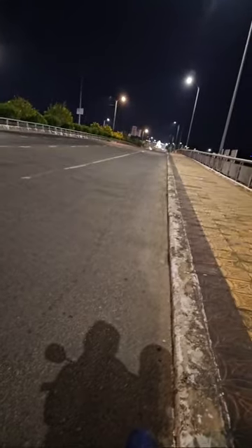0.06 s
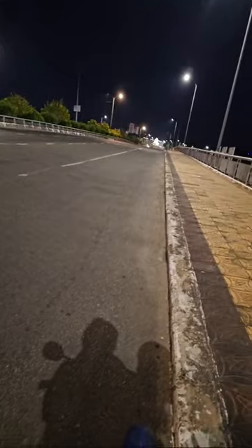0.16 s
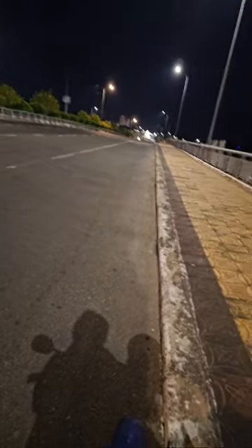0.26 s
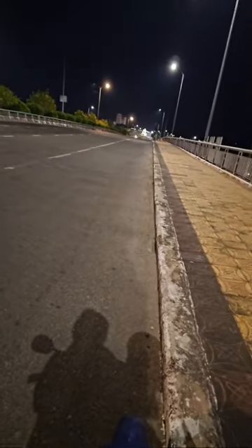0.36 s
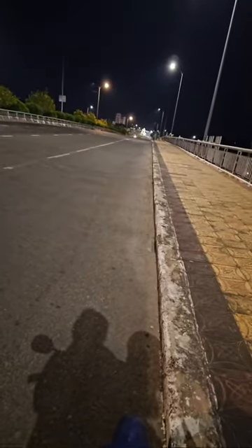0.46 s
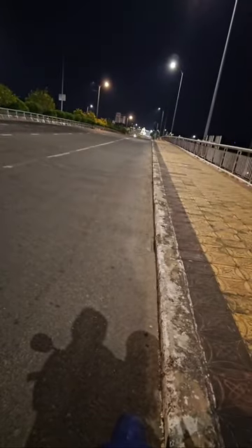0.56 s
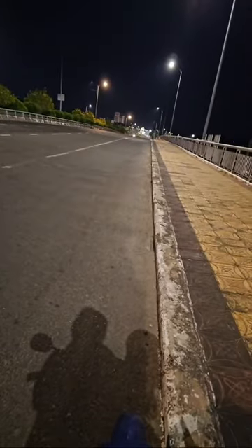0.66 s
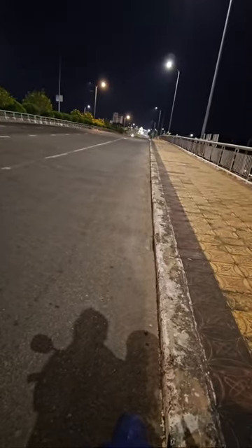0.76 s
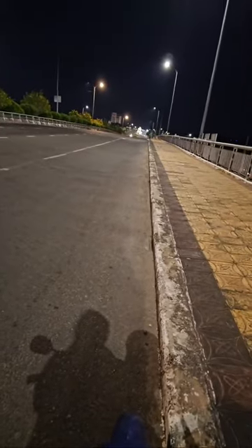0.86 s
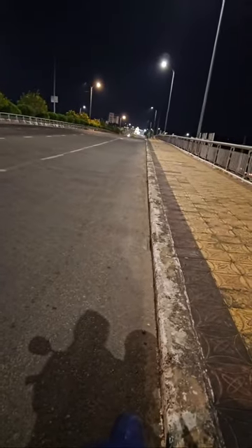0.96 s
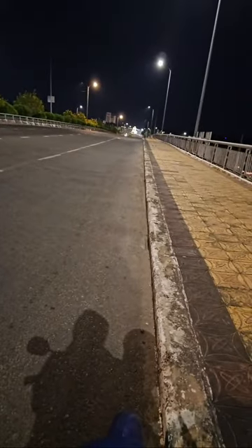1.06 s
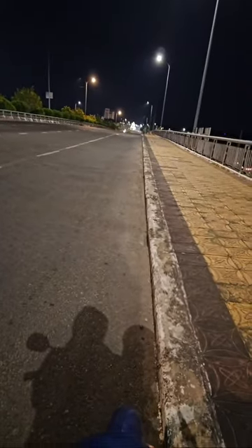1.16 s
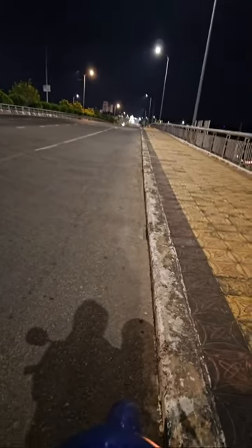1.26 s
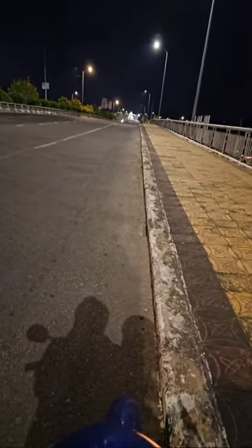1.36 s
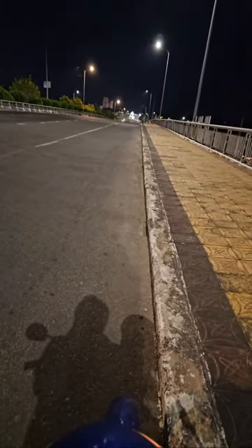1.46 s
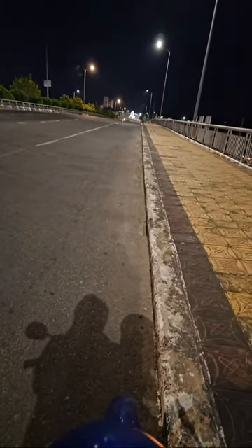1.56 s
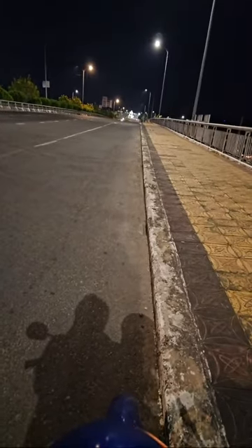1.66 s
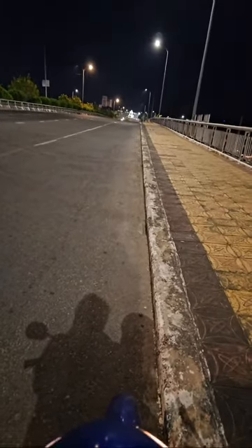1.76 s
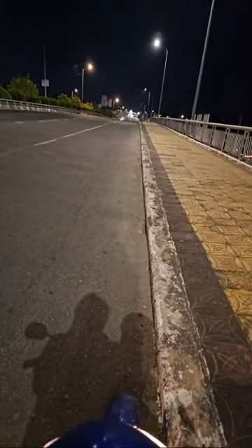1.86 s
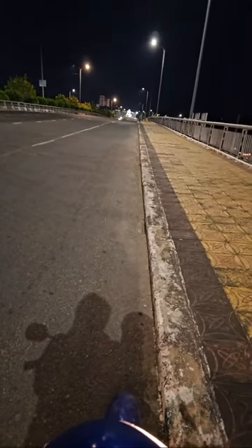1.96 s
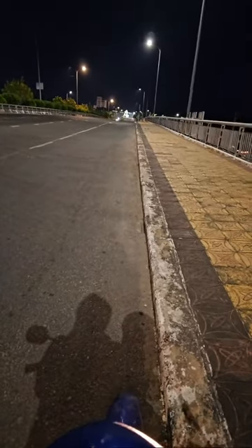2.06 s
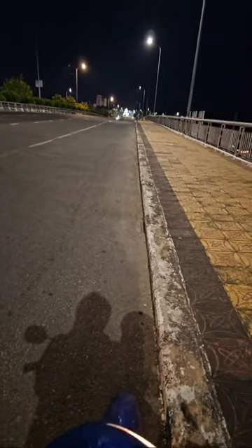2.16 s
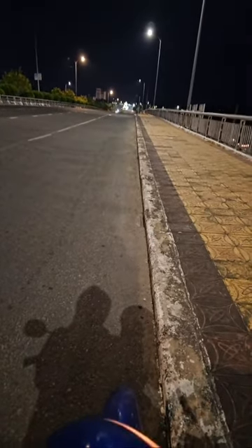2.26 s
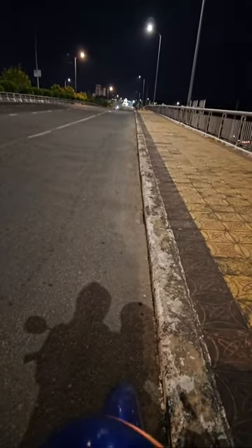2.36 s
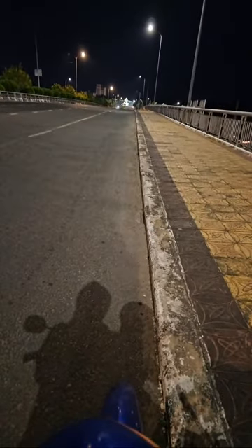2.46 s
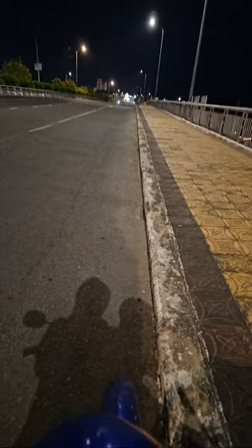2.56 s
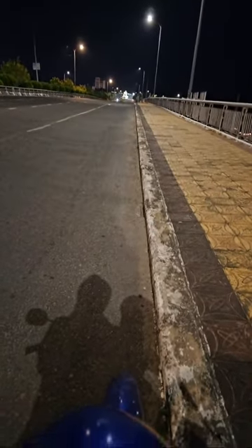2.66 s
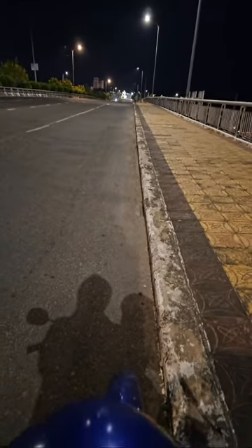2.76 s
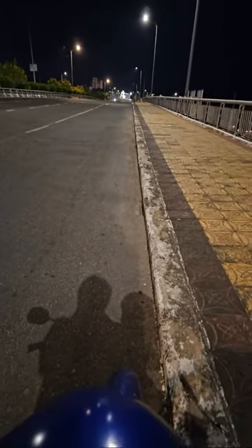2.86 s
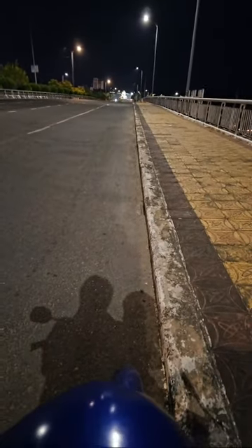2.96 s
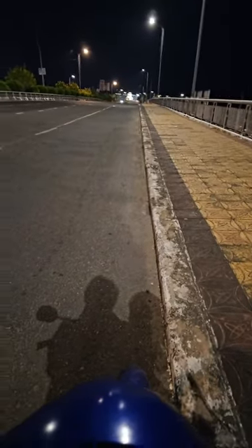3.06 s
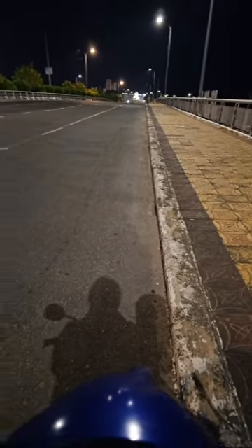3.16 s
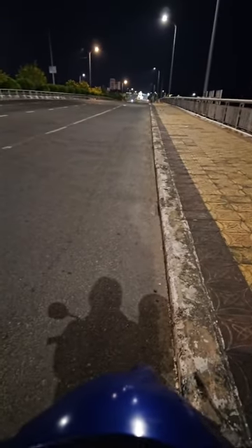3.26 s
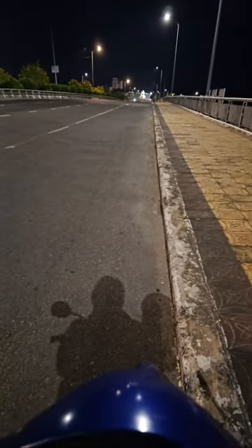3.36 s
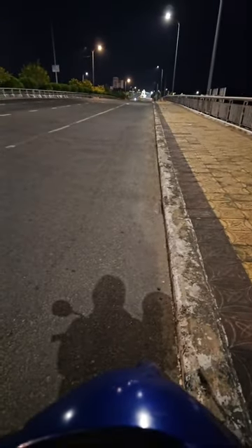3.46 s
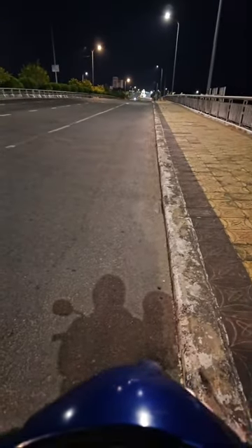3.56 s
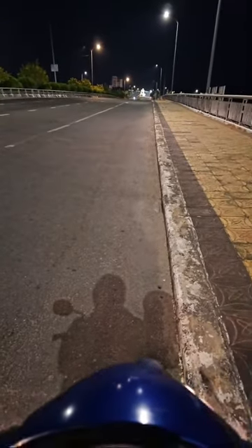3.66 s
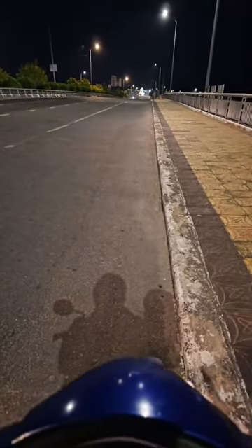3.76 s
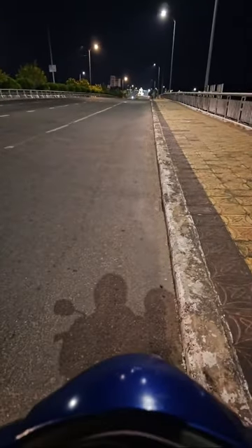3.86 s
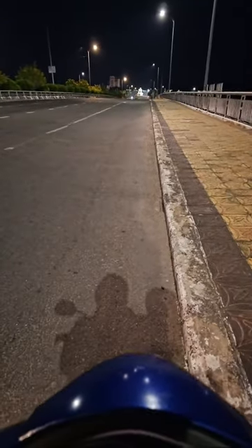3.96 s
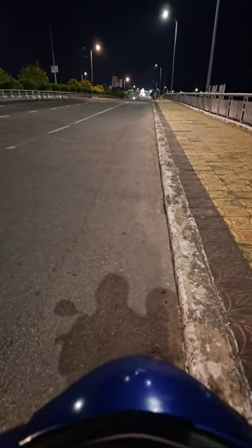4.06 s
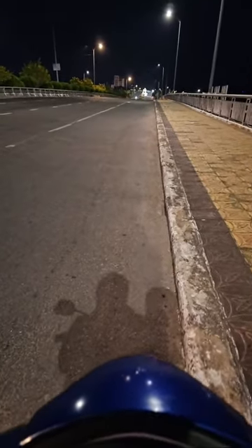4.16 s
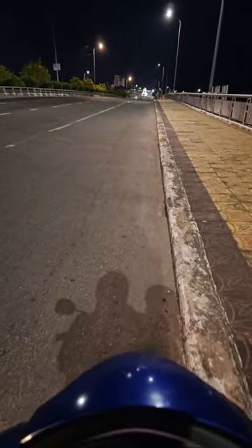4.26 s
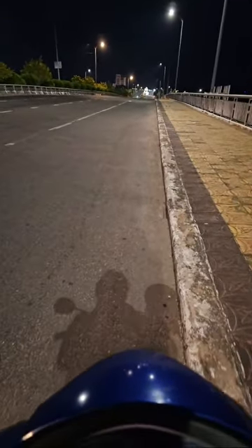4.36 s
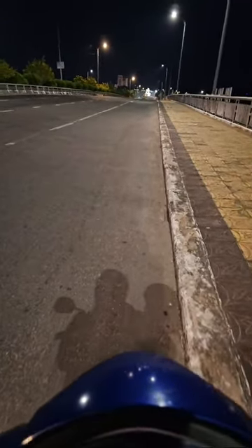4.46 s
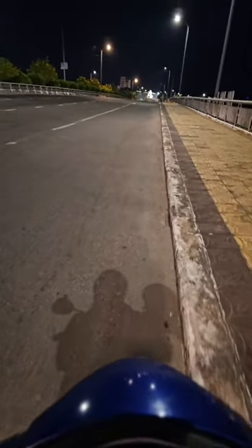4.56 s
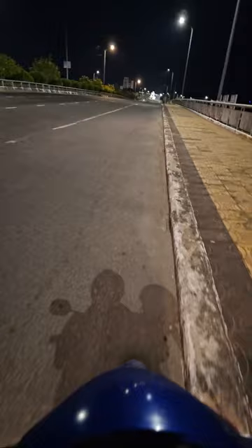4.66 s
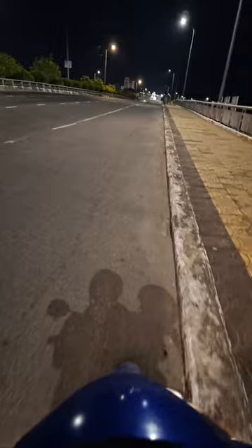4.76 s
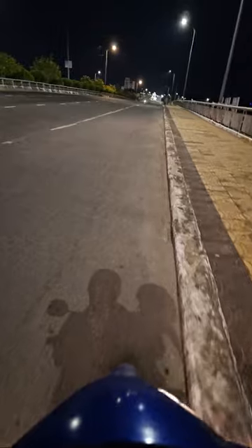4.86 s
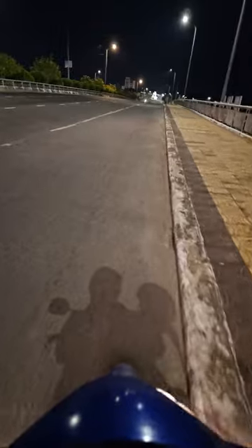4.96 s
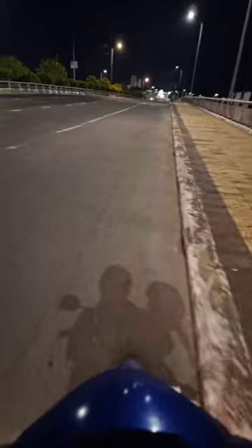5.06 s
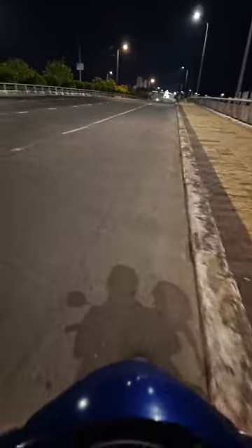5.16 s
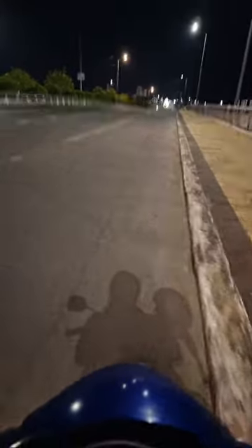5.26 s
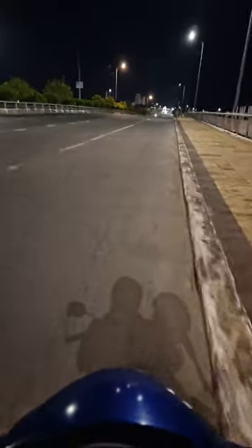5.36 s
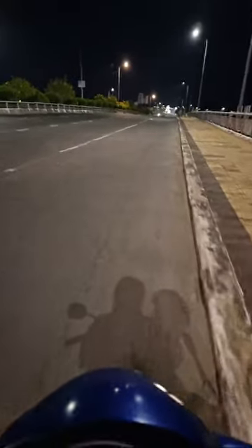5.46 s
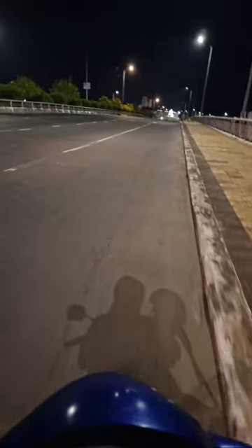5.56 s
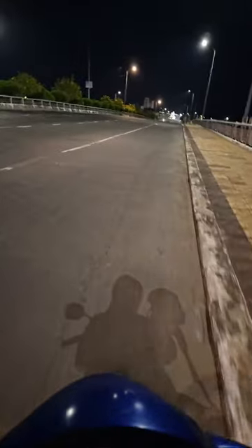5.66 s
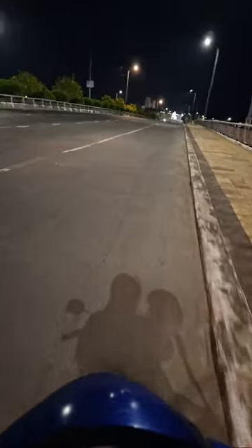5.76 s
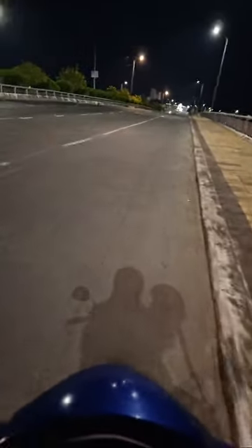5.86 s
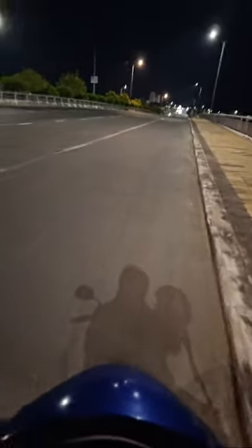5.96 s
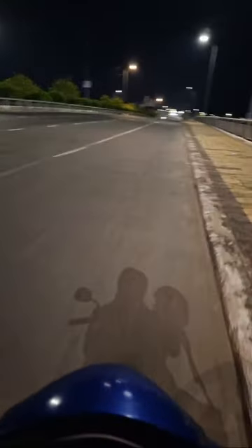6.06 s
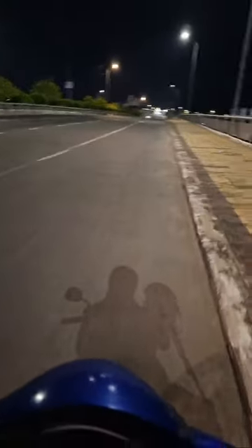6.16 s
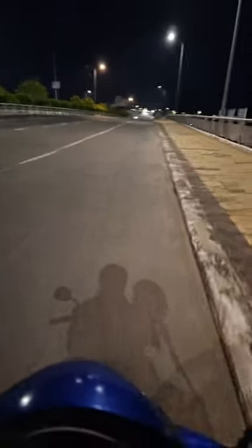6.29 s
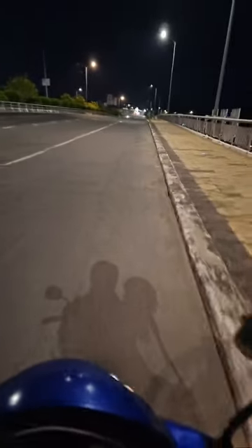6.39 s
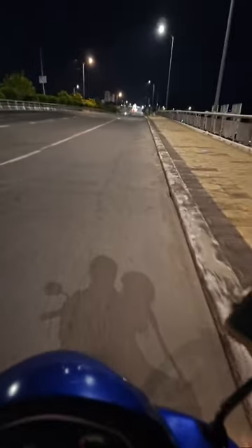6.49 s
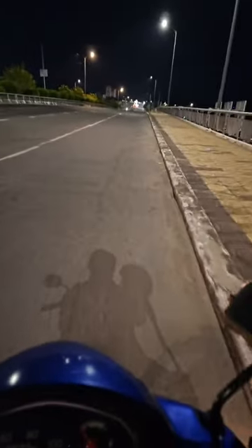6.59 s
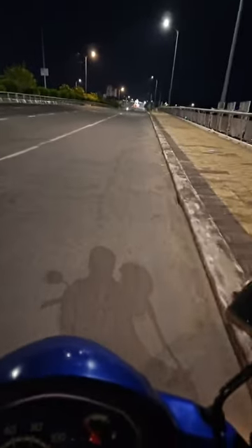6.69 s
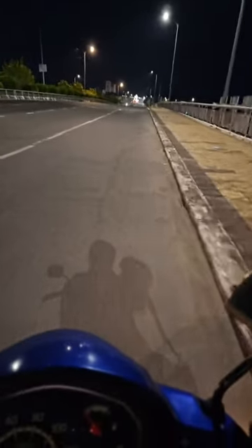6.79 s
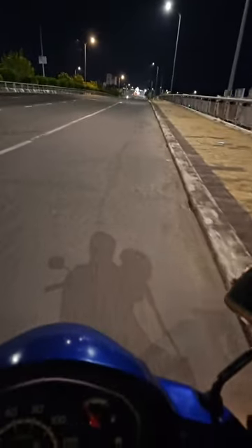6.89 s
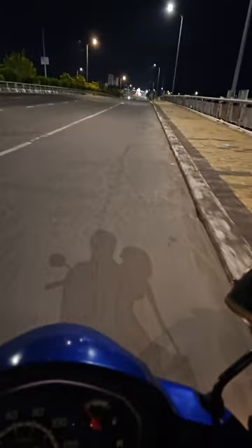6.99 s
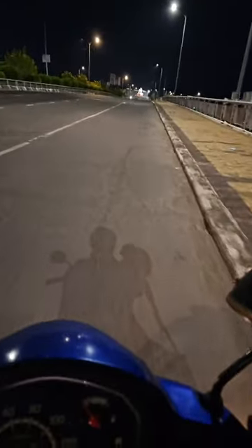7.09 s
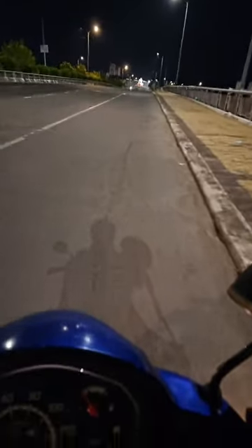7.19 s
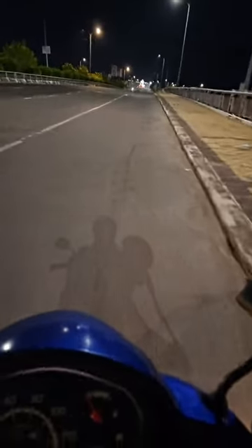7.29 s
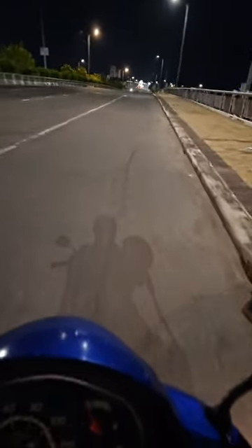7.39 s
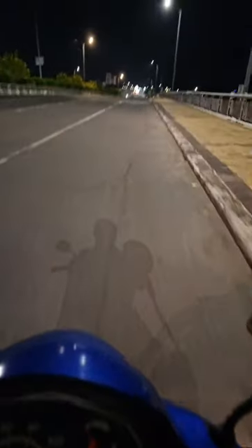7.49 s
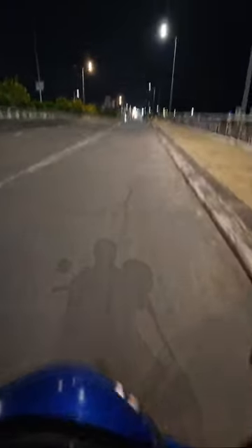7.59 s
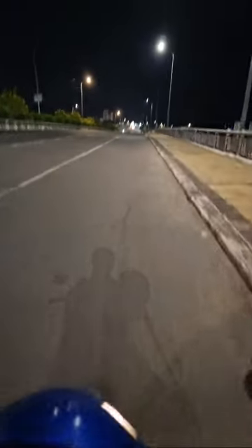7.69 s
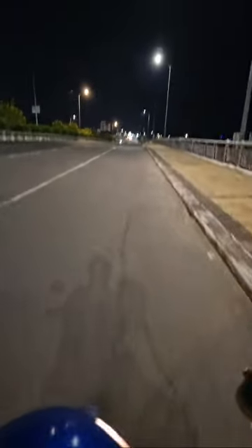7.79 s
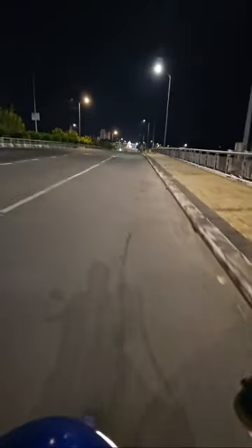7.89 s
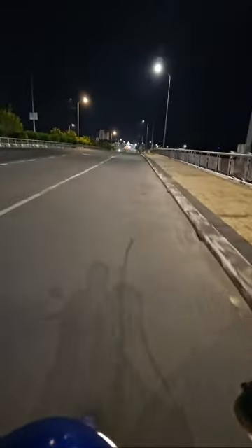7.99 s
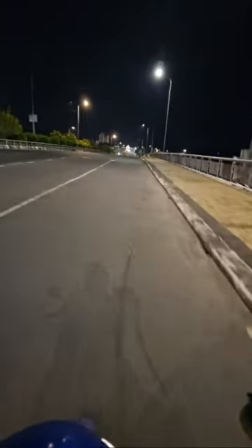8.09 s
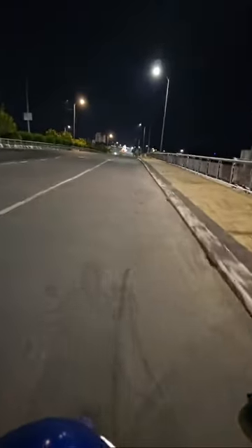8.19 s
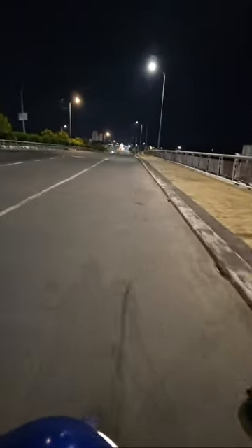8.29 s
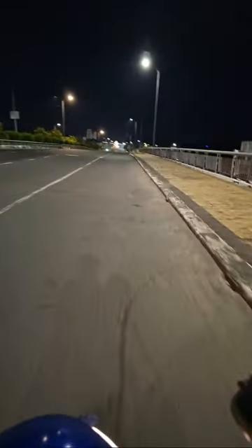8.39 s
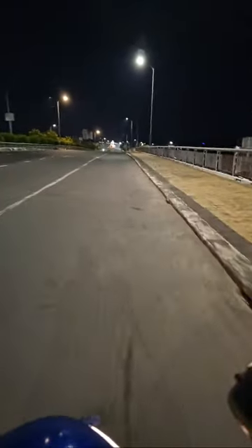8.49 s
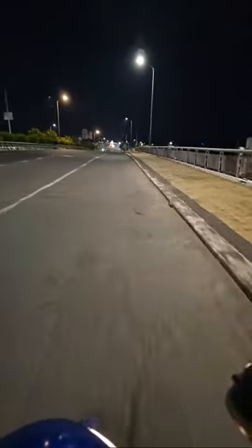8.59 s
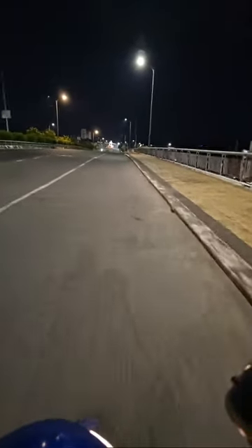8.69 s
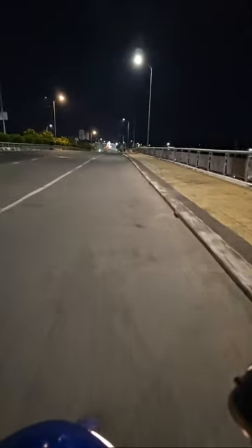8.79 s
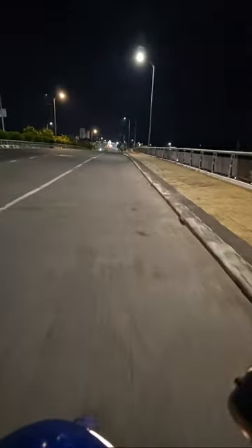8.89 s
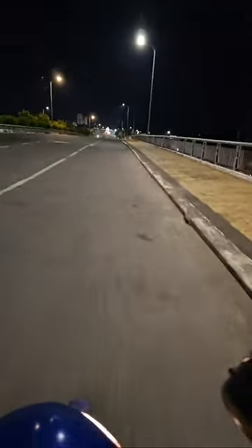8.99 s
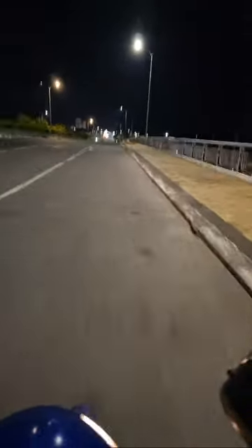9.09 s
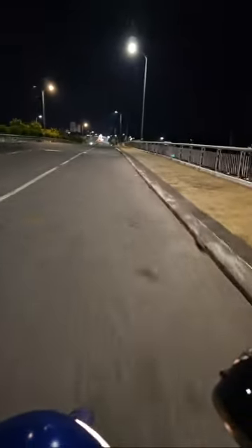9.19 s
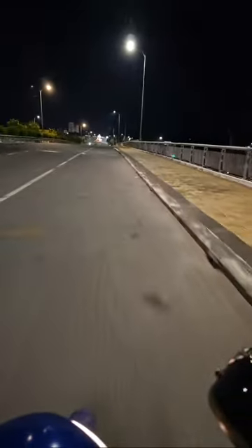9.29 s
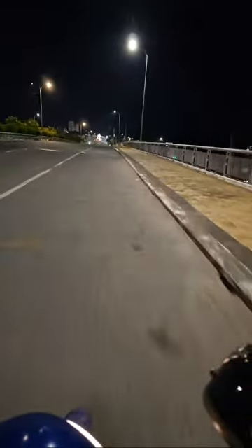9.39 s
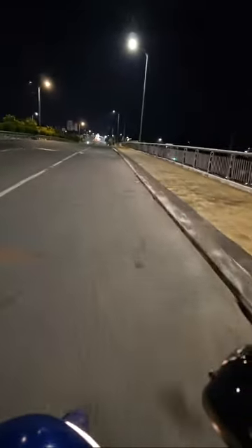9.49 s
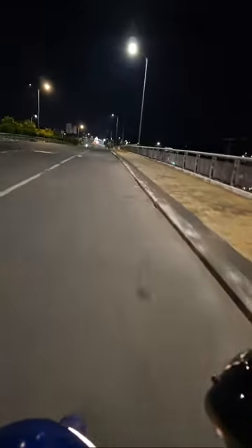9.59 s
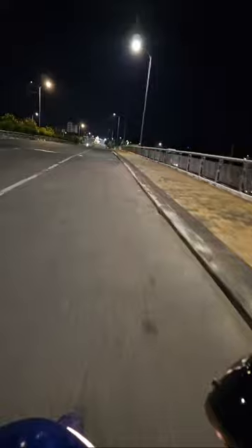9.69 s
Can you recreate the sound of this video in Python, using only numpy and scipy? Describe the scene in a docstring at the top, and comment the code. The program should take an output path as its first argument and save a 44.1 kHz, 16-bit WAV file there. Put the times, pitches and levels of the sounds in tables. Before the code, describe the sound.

An electric starter whirrs and clanks, stops, skids and tries again, then a small single-cylinder motorbike catches and pulls away into growing wind.

```python
"""An electric starter whirrs at once, clanking at each compression, while another small engine idles nearby.
It stops, skids and tries again; then the single-cylinder motorbike catches and pulls away, heard from the saddle.
Starter noise comes from shaped noise, gliding tones and ringing metal. Engine pulses ring the pipe and airbox.
Wind noise grows with the road speed, bumps knock the frame, and brief deep thumps come with small clicks."""
import sys
import numpy as np
from scipy import signal
from scipy.fft import rfft, irfft
from scipy.io import wavfile
from scipy.ndimage import uniform_filter1d

SR = 44100
rng = np.random.default_rng(int(sys.argv[2]) if len(sys.argv) > 2 else 0)


def dump(signal):
    """Clip the signal to [-1, 1] and save it as 16-bit WAV at the path in sys.argv[1]."""
    limited = np.clip(np.atleast_2d(signal).T, -1, 1)
    pcm = np.round(limited * 32767).astype(np.int16)
    wavfile.write(sys.argv[1], SR, pcm)


N = 429534
T = np.arange(N) / SR  # time of every sample in seconds


def undb(db):
    """Turn decibels into a gain."""
    return 10 ** (np.asarray(db) / 20)


def curve(rows):
    """Join (seconds, value) rows by straight lines."""
    return np.interp(T, *np.transpose(rows))


def held(on, off, attack, release):
    """Envelope that rises from on, holds at 1 and falls from off."""
    rise = (T - on) / attack
    fall = 1 - (T - off) / release
    return np.clip(np.minimum(rise, fall), 0, 1)


def unit(x):
    """Scale to an rms (average strength) of 1."""
    return x / np.sqrt(np.mean(x ** 2))


def noise(colour):
    """Noise of rms 1 with a (Hz, dB) spectrum that falls away below its first point."""
    hz, db = np.transpose(colour)
    f = np.maximum(np.arange(2 ** 18 + 1) * SR / 2 ** 19, 1)
    low_fall = np.minimum(f / hz[0], 1) ** 2
    gain = undb(np.interp(np.log(f), np.log(hz), db)) * low_fall
    white = rng.standard_normal(2 * len(f) - 2)
    return unit(irfft(gain * rfft(white))[:N])


def walk(rate):
    """Smooth random wandering of rms 1, with a new target rate times a second."""
    k = max(int(SR / rate), 1)
    steps = rng.standard_normal(N)[np.arange(N) // k]
    return unit(uniform_filter1d(steps, k))


def band(x, hz, width):
    """One resonance with gain 1 at its centre."""
    w = 2 * np.pi * hz / SR
    a = np.sin(w) * width / (2 * hz)
    return signal.lfilter([a, 0, -a], [1 + a, -2 * np.cos(w), 1 - a], x + 1e-18)


def cavity(pulses, modes):
    """Each pulse swells and dies in every resonance, as in a pipe or box."""
    out = 0
    for hz, width, db in modes:
        swell = band(band(pulses, hz, width), hz, width)
        out = out + undb(db) * SR / (np.pi * width) * swell
    return out


def metal(x, modes):
    """A metal part rings at each of its own pitches when rattled."""
    return sum(undb(db) * band(x, hz, width) for hz, width, db in modes)


def strikes(times, sizes):
    """One single-sample impulse at each time."""
    places = np.clip(np.asarray(times) * SR, 0, N).astype(int)
    return np.bincount(places, sizes, N + 1)[:N]


def bursts(rows, tail_s):
    """Envelope of (s, dB, length s) bursts: a 4.5 ms rise, and a decay that begins after the length."""
    out, t = np.zeros(N + SR), T[:SR // 4]
    for s, db, length in rows:
        i = int(max(s, 0) * SR)
        decay = np.exp(-np.maximum(t - length, 0) / tail_s)
        out[i:i + len(t)] += undb(db) * np.minimum(t / 0.0045, 1) * decay
    return out[:N]


# Where the neighbour's engine resonates. Each row: pitch in Hz, width in Hz, level in dB.
NEIGHBOUR = [(53.5, 4.6, -38), (83, 51, -32), (151, 23, -35), (170, 32, -44), (249, 43, -38),
             (340, 120, -34)]
# The tone of the night air. Each row: frequency in Hz, relative level in dB.
NIGHT = [(18, -56), (30, -34), (100, -5), (137, 4.5), (183, -12), (203, -6.5), (279, -8.5), (318, -5),
         (435, -19.5), (645, -20), (795, -28.5), (10700, -50.5), (15800, -67)]
NIGHT_DB = -33


def neighbour(idle_hz=23.17, scatter_db=2, jitter_s=0.00061):
    """Another small engine putters almost evenly over the steady noise of the night air."""
    count = np.arange(300)
    timing, strength = rng.standard_normal((len(count), 2)).T
    pulses = strikes(count / idle_hz + jitter_s * timing, undb(scatter_db * strength))
    return cavity(pulses, NEIGHBOUR) + undb(NIGHT_DB) * noise(NIGHT)


# The starter clutch clanks as the piston passes the top.
# Each row: start in seconds, level in dB, rattle length in seconds, ring level in dB.
COMPRESSIONS = [(0.116, -17.5, 0.013, -5), (0.285, -20, 0.018, -3.5), (0.47, -18.5, 0.0087, -3),
                (0.66, -22, 0.019, 12), (0.854, -18.5, 0.011, -2.5), (1.035, -22.5, 0.018, -2),
                (1.212, -14, 0.0031, -4.5), (1.419, -18.5, 0.0045, 0), (1.634, -22, 0.029, 6.5),
                (1.81, -29, 0.0049, -16), (1.937, -16, 0.0027, -11), (2.035, -19.5, 0.0048, -14),
                (3.084, -33, 0.0051, -15), (3.216, -25.5, 0.028, 5), (3.288, -23.5, 0.025, 10.5)]
SLOWEST_STROKE_S = 0.17


def since_compression():
    """Seconds since the piston last passed the top; a slow stroke is under way at the start."""
    tops = np.array([COMPRESSIONS[0][0] - SLOWEST_STROKE_S] + [row[0] for row in COMPRESSIONS])
    latest = np.maximum(np.searchsorted(tops, T) - 1, 0)
    return np.maximum(T - tops[latest], 0)


# Presses of the starter button. Each row: on in seconds, off in seconds, run-down time constant in seconds.
TRIES = [(-.1, 2, 0.2), (2.989, 3.76, 0.28)]
# The tone of the starter gears. Each row: frequency in Hz, relative level in dB.
STARTER_COLOUR = [(400, -23), (650, 6), (930, 7), (1300, 6.5), (2100, 9), (2800, 2.5), (3600, 7.5),
                  (4400, 8.5), (5400, 5), (6300, -0.5), (7700, 1.5), (8300, 2.5), (9200, -2), (15800, -1.5)]
# The starter housing rings. Each row: pitch in Hz, width in Hz, relative level in dB.
STARTER_CASE = [(910, 45, -3), (3600, 200, -2.5), (5330, 360, -1.5), (8320, 350, -10)]
STARTER_DB, SPIN_UP_S = -32, 0.025


def starter(grain_db=2.14, case_db=-5, free_hz=478, sag=.38, recover_s=.075, whine_db=-35.0,
            strain_db=6, growl_db=-38):
    """Gears hiss grittily and growl; their whine drops and strains at each compression, then arcs back up."""
    effort = 0
    for on, off, run_down in TRIES:
        spin_up = 1 - np.exp(-np.maximum(T - on, 0) / SPIN_UP_S)
        effort = effort + spin_up * np.exp(-np.maximum(T - off, 0) / run_down)
    housing = undb(case_db) * unit(metal(rng.standard_normal(N), STARTER_CASE))
    hiss = unit((noise(STARTER_COLOUR) + housing) * undb(grain_db * walk(500)))

    strain = uniform_filter1d(np.exp(-since_compression() / recover_s), SR // 40)
    hz = free_hz * (1 - sag * strain + .016 * walk(90))
    whine_level = undb(2 * walk(39.8) + strain_db * (strain - 1.0))
    whine = np.sin(2 * np.pi * np.cumsum(hz) / SR) * whine_level
    growl = noise([(60, -14), (90, -28), (125, 9.0), (180, -12), (230, 6.5), (280, -33), (360, 7),
                   (420, -3), (600, -20), (1500, -31)])
    gears = undb(STARTER_DB) * hiss + undb(growl_db) * growl
    return effort * gears + effort ** 2 * undb(whine_db) * whine


# The starter drive snaps in or out of grip.
# Each row: start in seconds, clank level in dB, grate level in dB, grate pitch in Hz.
SNAPS = [(1.372, -23, -54, 960), (1.505, -19.5, -61, 1000), (1.561, -18, -40, 963), (2.193, -17, -39, 990),
         (2.294, -42, -36.5, 750), (2.339, -44, -35.5, 690), (2.993, -26.5, -45, 910)]
# The clutch ring's own pitches. Each row: pitch in Hz, width in Hz, relative level in dB.
CLUTCH = [(1930, 80, 2), (4080, 72, -23), (5500, 310, 4), (9680, 140, 9), (9940, 340, -1)]
# The tone of a dry metal clank. Each row: frequency in Hz, relative level in dB.
CLANK_COLOUR = [(350, 6.5), (700, 1), (950, 7), (1400, 2.5), (2200, -1), (2800, 0), (4000, 5), (5500, 4),
                (6800, -8.5), (9000, -2.5), (10300, -3.5), (12000, -11), (15800, -10)]
# every snap starts to fade this soon, and rings this little
SNAP_S, SNAP_RING_DB = 0.00066, -10


def clutch(tail_s=0.015, rattle_db=-0.5, body_db=-2, ring_db=-4.0):
    """Rollers chatter against the clutch ring in short, dry bursts."""
    clanks = list(COMPRESSIONS) + [(s, db, SNAP_S, SNAP_RING_DB) for s, db, _, _ in SNAPS]
    chatter = unit(undb(rattle_db * np.minimum(walk(770), 2)))
    body = bursts([row[:3] for row in clanks], tail_s) * chatter * noise(CLANK_COLOUR)
    rub = rng.standard_normal(N) * chatter
    # a low ring level weakens the blow; a high one adds nothing here
    blows = bursts([(s, db + min(ring, 0), length) for s, db, length, ring in clanks], tail_s / 2)
    ringing = metal(blows * rub, CLUTCH) / np.std(metal(rub, CLUTCH))
    return undb(body_db) * body + undb(ring_db) * ringing


def squeaks(squeak_db=-5.0, start_hz=2110, slide_hz_per_s=12000, slide_s=0.009, peak_s=0.011,
            swell_s=0.0073, waver=0.0116, octave_db=-15, fifth_db=-3.0):
    """In each clank a roller slips with a brief squeak that slides down as the crank slows."""
    push = 0
    for s, db, _, ring in COMPRESSIONS:
        push = push + undb(db + ring) * np.exp(-((T - s - peak_s) / swell_s) ** 2)
    slide = slide_hz_per_s * np.minimum(since_compression(), slide_s)
    hz = (start_hz - slide) * (1 + waver * walk(500))
    phase = 2 * np.pi * np.cumsum(hz) / SR
    partials = np.sin(phase) + undb(octave_db) * np.sin(2 * phase) + undb(fifth_db) * np.sin(5 * phase)
    return undb(squeak_db) * push * partials


# Full of cold gas, the pipe rings low and dull. Each row: pitch in Hz, width in Hz, level in dB.
COLD_PIPE = [(104, 21, -24), (133.2, 52, -6.5), (225, 47, -19.5)]


def cold_pipe(pulses):
    """A cold charge burns slowly and gives the pipe a soft push of about 2 ms."""
    return -cavity(uniform_filter1d(pulses, SR // 500), COLD_PIPE)


# Lone firings and coughs before the engine runs. Each row: start in seconds, strength in dB.
COUGHS = [(1.163, -7), (1.7, 2.5), (1.767, -6), (3.209, -1), (3.362, 0)]
# a chuff comes this share of a stroke after each compression
CHUFF_DB, CHUFF_SHARE = -21, .41


def cranking(chuff_hz=75, chuff_width_hz=42):
    """Unfired air chuffs softly from the silencer after each compression; now and then a charge lights."""
    tops = np.array([row[0] for row in COMPRESSIONS])
    strokes = np.minimum(np.diff(tops, append=np.inf), SLOWEST_STROKE_S)
    puffs = strikes(tops + CHUFF_SHARE * strokes, np.ones(len(tops)))
    chuffs = cavity(puffs, [(chuff_hz, chuff_width_hz, CHUFF_DB)])
    s, db = np.transpose(COUGHS)
    return chuffs + cold_pipe(strikes(s, undb(db)))


# The drive skids after letting go and before taking hold.
# Each row: loudest moment in seconds, grit level in dB, squeal level in dB, pitch in Hz.
SKIDS = [(2.254, -30, -32, 1000), (3.062, -32.5, -17, 953)]
# The drive's own pitches. Each row: multiple of the grate pitch, width in Hz, relative level in dB.
DRIVE = [(1, 92.5, 14), (1.12, 120, -19), (1.5, 390, -3), (2.0, 353, -25), (4.8, 1200, -49)]
SKID_SWELL_S = 0.025  # time constant of a skid's swell and fade


def drive(tail_s=0.028, grit_db=3, drive_db=15, waver=0.0514, octave_db=-8, scrape_db=2.0,
          judder_db=4, squeal_power=1.07):
    """Teeth grate briefly at each snap; in a skid they swell, scrape, squeal on their own note and fade."""
    rub = unit(rng.standard_normal(N) * undb(grit_db * np.minimum(walk(400), 2)))
    wobble = np.cumsum(1 + waver * walk(300)) / SR

    def grate(push, pitch_hz):
        """Gritty contact rings the drive."""
        modes = [(multiple * pitch_hz, width, db) for multiple, width, db in DRIVE]
        return undb(drive_db) * metal(push * rub, modes)

    out = sum(grate(bursts([(s, db, SNAP_S)], tail_s), pitch_hz) for s, _, db, pitch_hz in SNAPS)
    scrape = undb(scrape_db) * noise(CLANK_COLOUR)
    judder = unit(undb(judder_db * np.minimum(walk(130), 2)))
    for s, db, squeal_db, pitch_hz in SKIDS:
        push = judder * np.exp(-np.abs(T - s) / SKID_SWELL_S)
        phase = 2 * np.pi * pitch_hz * wobble
        squeal = np.sin(phase) + undb(octave_db) * np.sin(2 * phase)
        out = out + grate(undb(db) * push, pitch_hz)
        out = out + undb(db) * push * scrape
        out = out + undb(squeal_db) * push ** squeal_power * squeal
    return out


def hum(start_hz=124, end_hz=146, hum_db=-37, octave_db=-5, waver=0.0399, flutter_db=2):
    """A low, wavering hum climbs slowly behind the pause, like traffic some way off."""
    hz = np.interp(T, [1.75, 3.0], [start_hz, end_hz]) * (1 + waver * walk(40))
    phase = 2 * np.pi * np.cumsum(hz) / SR
    swell = held(1.94, 3.0, 0.31, .4) * undb(hum_db + flutter_db * walk(24.9))
    return swell * (np.sin(phase) + undb(octave_db) * np.sin(2 * phase))


def whistle(start_hz=10200, end_hz=10800, whistle_db=-60):
    """A faint, hazy whistle climbs in the pause between the two tries."""
    hz = np.interp(T, [2.4, 2.95], [start_hz, end_hz])
    haze = walk(1000) * held(2.43, 3, .25, 0.12)
    return undb(whistle_db) * haze * np.sin(2 * np.pi * np.cumsum(hz) / SR)


# Gusts of wind. Each row: start in seconds, end in seconds, change in level in dB.
GUSTS = [(5.92, 6.053, 6.5), (6.3, 6.42, 5.5), (6.58, 6.988, 7), (6.877, 7.0, 1), (7.15, 8.25, -1),
         (8.327, 9.74, 2.5), (8.95, 9.75, 0.5)]
# The tone of the wind. Each row: frequency in Hz, relative level in dB.
WIND_COLOUR = [(25, -28), (40, -12), (55, -5), (90, -2.5), (140, 4), (200, -2.5), (310, -4), (450, -11),
               (700, -23.5), (1100, -36.5), (1800, -41.5), (3000, -45), (6000, -57)]
# The tone of the tearing air. Each row: frequency in Hz, relative level in dB.
TEAR_COLOUR = [(450, -3.5), (600, -2.5), (1000, -4.5), (1500, -11), (2500, -26), (8000, -43)]
# the drive clutch starts to bite, takes this long, and the bike gathers speed evenly
BITE_S, BITE_TAKES_S, ACCELERATION_M_S2 = 3.28, 0.53, 1.026
# wind level at 1 m/s before gusts; it grows with this power of the road speed
WIND_DB, WIND_POWER, GUST_EDGE_S = -36, 1.26, 0.1


def wind(sway_db=0.56, eddy_db=1.3, flutter_db=1.7, tear_db=-86.5, tear_power=3.31, rip_db=4):
    """Eddies buffet the microphone, harder with speed and gusts; at speed the air tears in coarse bursts."""
    road_speed = ACCELERATION_M_S2 * np.maximum(T - BITE_S, 0)
    gusts_db = sum(db * held(on, off, GUST_EDGE_S, GUST_EDGE_S) for on, off, db in GUSTS)
    buffet = undb(sway_db * walk(5) + eddy_db * walk(16) + flutter_db * walk(90))
    rumble = undb(WIND_DB + gusts_db) * road_speed ** WIND_POWER * unit(noise(WIND_COLOUR) * buffet)
    tearing = unit(noise(TEAR_COLOUR) * buffet * undb(rip_db * np.minimum(walk(70), 2)))
    return rumble + undb(tear_db + gusts_db / 2) * road_speed ** tear_power * tearing


def sizzle(sizzle_hz=8800, width_hz=1100, sizzle_db=-69):
    """A thin hiss grows with the road speed."""
    road_speed = ACCELERATION_M_S2 * np.maximum(T - BITE_S, 0)
    hiss = unit(cavity(rng.standard_normal(N), [(sizzle_hz, width_hz, 0)]))
    return undb(sizzle_db) * road_speed * hiss


# Engine speed once it has run up. Each row: time in seconds, firings per second in Hz.
SPEED = [(4.15, 24.49), (4.6, 26.83), (5.15, 28.83), (5.8, 29.47), (6.6, 29.27), (7.4, 28.46), (8.2, 28.33),
         (8.65, 27.9), (8.85, 27.4), (9.38, 27.1), (9.6, 28.2)]
# Throttle, eased for a moment after the getaway. Each row: time in seconds, pulse strength in dB.
LOAD = [(3.45, 3.5), (4.3, 2), (5, 0.9), (6.85, -1), (7.1, -6.5), (8.25, -7), (8.45, -0.5), (9.74, -7.5)]
# Under load the drive rasps in swells.
# Each row: start in seconds, end of the hold in seconds, level in dB, centre in Hz, width in Hz.
RASPS = [(3.496, 4.803, -44, 1770, 600), (4.25, 4.698, -42.5, 2090, 280), (4.798, 6.7, -47, 3200, 700),
         (4.9, 6.3, -51, 4730, 1105), (6.28, 6.79, -40, 1700, 750)]
# Resonances of the warm pipe, then of the airbox, then of the airbox droning behind a nearly shut throttle,
# then of the cylinder head ticked by the closing valves.
# Each row of these four: pitch in Hz, width in Hz, level in dB.
PIPE = [(119.4, 27.3, -18.5), (148.4, 41, -9), (223.8, 46, -15.5), (389.3, 17.3, -26.5), (446, 48, -28.5)]
AIRBOX = [(71.2, 31, -15), (138.6, 32, -12.5), (168.8, 60, -13), (279, 82, -18.5), (333.5, 50.5, -10.5),
          (563.4, 41, -27)]
SHUT_AIRBOX = [(166.5, 36, -24), (321, 24, -32), (341.7, 18, -36.5)]
HEAD = [(2150, 600, -36), (3020, 1030, -25.5), (4900, 2000, -36)]
# The tone of gas rushing through the open intake valve, then of the chain, valve gear and tyres.
# Each row of these two: frequency in Hz, relative level in dB.
RUSH = [(330, 2.5), (410, 4.5), (470, -5.5), (590, 0), (700, -21), (1000, -13), (1500, -42), (3000, -35)]
MACHINE_COLOUR = [(470, 1), (800, 1), (1290, -7.5), (1630, -7), (2120, -8), (2400, -15), (3240, -9.5),
                  (3900, -12.5), (4890, -12.5), (6760, -25.5), (9120, -18), (11600, -22.5), (12500, -19.5),
                  (15200, -20.5), (15800, -22.5)]
# the engine catches this far below its speed and runs up with this time constant; the pipe takes longer to warm
CATCH_S, CATCH_BELOW_HZ, RUN_UP_S, WARM_UP_S = 3.460, 11.05, .194, 0.57
SHUT_DB, RASP_EDGE_S = -3.5, 0.19  # pulse strength at which the throttle counts as shut; rasp fade time
# chain, valve gear and tyres grow with a power of the load and of the engine speed
MACHINE_DB, MACHINE_LOAD_POWER, MACHINE_SPEED_POWER = -33.5, 0.66, 1.8


def engine(intake_place=.767, intake_growth=7, tick_place=0.765, clatter=0.1, tick_db=-16.0,
           rush_db=-34, rush_opens_s=0.12):
    """One exhaust pulse and one intake gulp a cycle; the gulp grows with speed, and metal clatters in step."""
    since_catch = T - CATCH_S
    hz = curve(SPEED) - CATCH_BELOW_HZ * np.exp(-np.maximum(since_catch, 0) / RUN_UP_S)
    revs, strength = hz / hz.max(), undb(curve(LOAD))
    cycles = np.cumsum(hz * (T > CATCH_S)) / SR
    count = np.arange(int(cycles[-1]) + 1)
    engaged = np.clip((T - BITE_S) / BITE_TAKES_S, 0, 1)

    def valve(place, size):
        """One slightly uneven impulse a cycle, at this share of the cycle."""
        timing, force = rng.standard_normal((len(count), 2)).T
        s = np.interp(count + place + 1e-6, cycles, T) + .00008 * timing
        return strikes(s, np.interp(s, T, size) * undb(.8 * force))

    def gate(place, order=4):
        """A smooth swell once a cycle."""
        return unit(np.cos(np.pi * (cycles - place)) ** order) * (cycles > 0)

    warm = np.clip(since_catch / WARM_UP_S, 0, 1)
    firings = valve(0, strength)
    exhaust = cold_pipe(firings * (1 - warm)) - cavity(firings * warm, PIPE)
    intake = cavity(valve(intake_place, strength * revs ** intake_growth), AIRBOX)
    shut = np.clip(curve(LOAD) / SHUT_DB, 0, 1)
    drone = cavity(valve(intake_place, shut), SHUT_AIRBOX)
    opening = np.clip(since_catch / rush_opens_s, 0, 1)
    rush = undb(rush_db) * strength * opening * gate(0.77) * noise(RUSH)

    # a valve seats and its rocker taps just after: each a short rough contact
    seats = valve(tick_place, engaged) + 0.65 * valve(tick_place + 0.11, engaged)
    contact = signal.lfilter([1], [1, -np.exp(-1 / (0.0014 * SR))], seats + 1e-18)
    ticks = undb(tick_db) * cavity(contact * rng.standard_normal(N), HEAD)

    rub = rng.standard_normal(N)
    swells = 0
    for on, off, db, centre, width in RASPS:
        tone = unit(cavity(rub, [(centre, width, 0)]))
        swells = swells + undb(db) * held(on, off, RASP_EDGE_S, RASP_EDGE_S) * tone
    rasp = gate(1.0, order=6) * swells

    beat = 1 + clatter * np.cos(2 * np.pi * (cycles - 0.02))
    machine = unit(noise(MACHINE_COLOUR) * beat * undb(1.75 * walk(250)))
    work = engaged * strength ** MACHINE_LOAD_POWER * revs ** MACHINE_SPEED_POWER
    return exhaust + intake + drone + rush + ticks + rasp + undb(MACHINE_DB) * work * machine


# The catching engine throws the starter drive off with hard clacks.
# Each row: start in seconds, crack level in dB, ring strength in dB.
CLACKS = [(3.518, -16, 1), (3.571, -16, -1.5), (3.622, -19, -7), (3.832, -17, -13), (3.963, -25, -7)]
# The crankcase's own pitches. Each row: pitch in Hz, width in Hz, level in dB.
CRANKCASE = [(376, 36, -15), (600, 66, -23), (790, 83, -24), (1050, 250, -16.5)]


def clacks(crack_s=0.0043):
    """A sharp metal crack, and the crankcase rings briefly."""
    s, _, ring_db = np.transpose(CLACKS)
    cracks = bursts([(t, db, 0) for t, db, _ in CLACKS], crack_s) * noise(CLANK_COLOUR)
    return cracks + cavity(strikes(s, undb(ring_db)), CRANKCASE)


# Brief deep thumps. Each row: start in seconds, thump strength in dB, click level in dB.
THUMPS = [(3.868, -34, -13), (5.985, -25, -23), (6.365, -36, -6.5), (7.69, -42, -39), (9.308, -27, -7.5)]


def thumps(thump_hz=28, thump_width_hz=45, click_s=0.0025):
    """Brief deep thumps from one low resonance, each with a small click of noise."""
    s, db, click_db = np.transpose(THUMPS)
    deep = cavity(strikes(s, undb(db)), [(thump_hz, thump_width_hz, 8)])
    clicks = bursts([(t, d, 0) for t, d in zip(s, click_db)], click_s)
    return deep + clicks * noise([(300, 14), (2000, -2.5), (15800, -18)])


# Bumps in the road knock the frame. Each row: start in seconds, thud strength in dB, knock level in dB.
BUMPS = [(6.389, -18, -17.5), (6.628, -22, -28), (6.702, -12, -30), (6.947, -11, -32), (6.999, -2, -14),
         (7.899, -7, -36), (9.062, -11, -13.5), (9.117, -25, -17), (9.631, -22, -15)]
# The frame's own pitches. Each row: pitch in Hz, width in Hz, level in dB.
FRAME = [(67.6, 27, -7.5), (127, 33, -3.5), (293, 190, -2), (650, 590, -40)]
# The tone of the knocking panels. Each row: frequency in Hz, relative level in dB.
KNOCK_COLOUR = [(400, 16), (700, 5), (1100, -10.5), (2200, -20.5), (5000, -25), (15800, -58)]


def bumps(knock_s=0.005):
    """The wheels drop over rough patches: the frame thuds and the panels knock."""
    s, db, _ = np.transpose(BUMPS)
    knocks = bursts([(t, knock_db, knock_s) for t, _, knock_db in BUMPS], knock_s)
    return cavity(strikes(s, undb(db)), FRAME) + knocks * noise(KNOCK_COLOUR)


def scene(low_cut_hz=43):
    """The open road gives no echo; the microphone hears little deep bass, but the thumps keep theirs."""
    starting = starter() + clutch() + squeaks() + cranking() + drive() + whistle() + clacks()
    riding = engine() + bumps() + sizzle() + wind()
    air = neighbour() + starting + hum() + riding
    low_cut = signal.butter(4, low_cut_hz, "high", fs=SR, output="sos")
    return (signal.sosfilt(low_cut, air) + thumps())[None]


TOP_HZ = 15850  # the treble stops here


def record(dry):
    """The microphone rounds only the very highest peaks and cuts the top steeply."""
    rounded = dry / (1 + (dry / .95) ** 8) ** (1 / 8)
    top_cut = signal.ellip(12, .1, 90, TOP_HZ, fs=SR, output="sos")
    return signal.sosfilt(top_cut, rounded)


dry = scene()
out = record(dry)
dump(out)
```